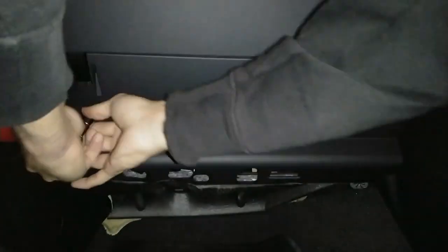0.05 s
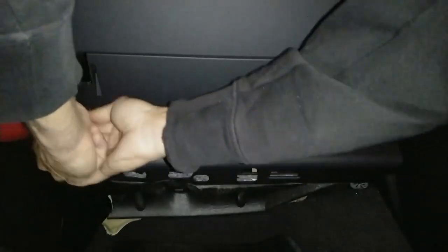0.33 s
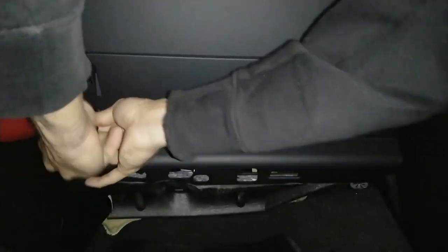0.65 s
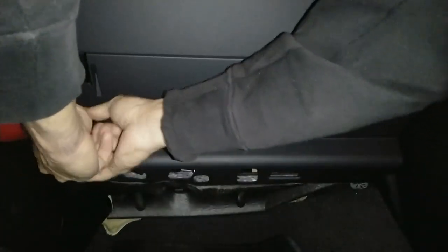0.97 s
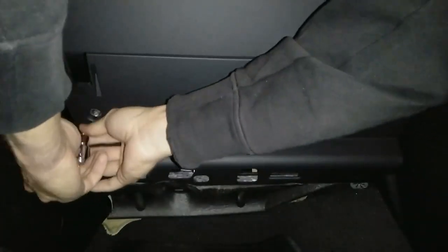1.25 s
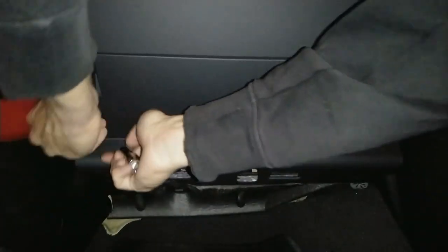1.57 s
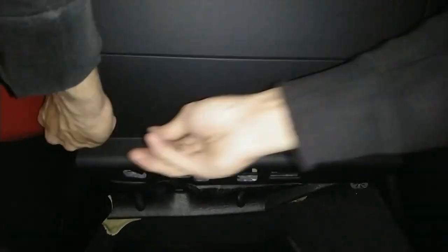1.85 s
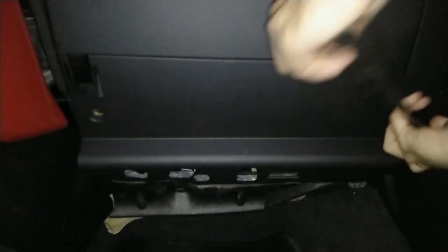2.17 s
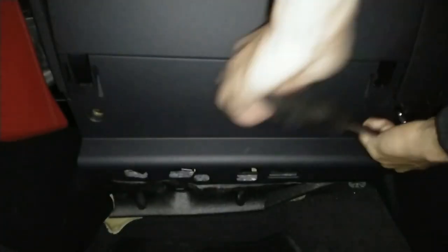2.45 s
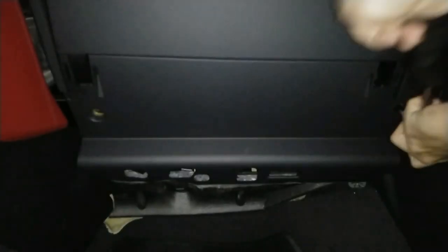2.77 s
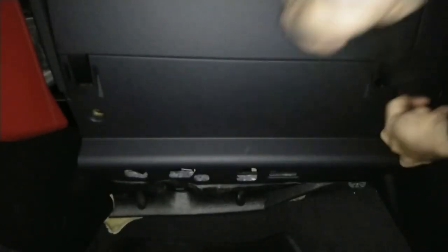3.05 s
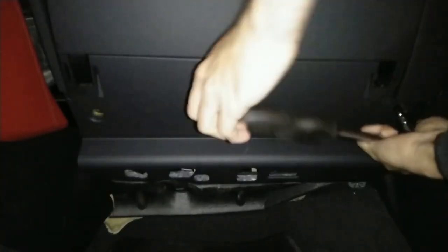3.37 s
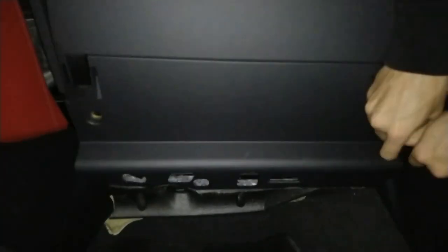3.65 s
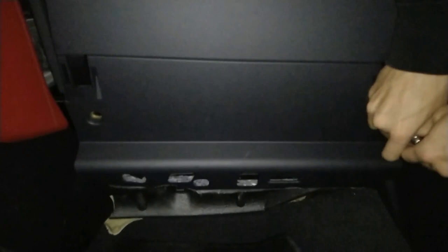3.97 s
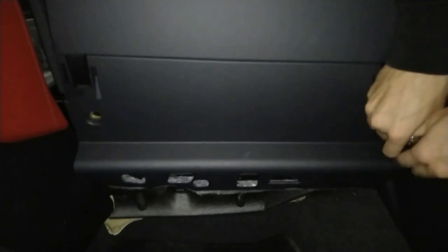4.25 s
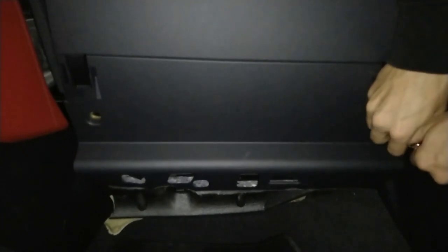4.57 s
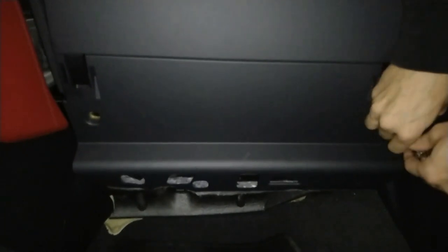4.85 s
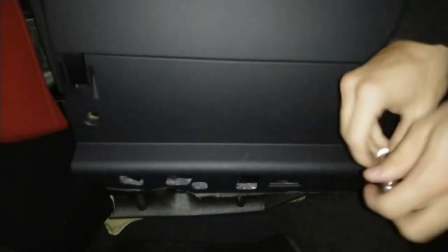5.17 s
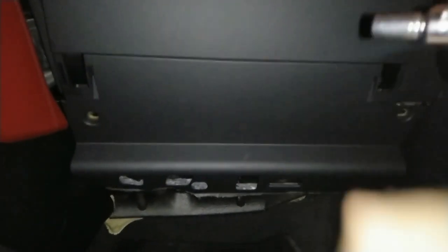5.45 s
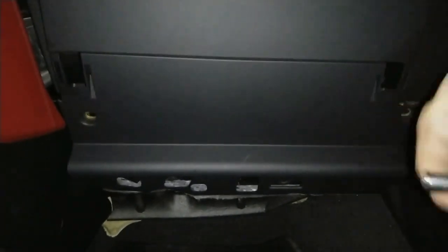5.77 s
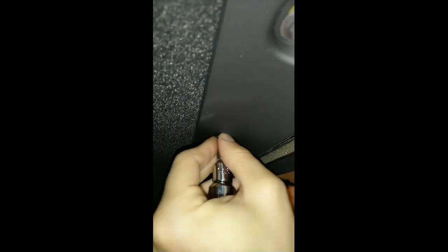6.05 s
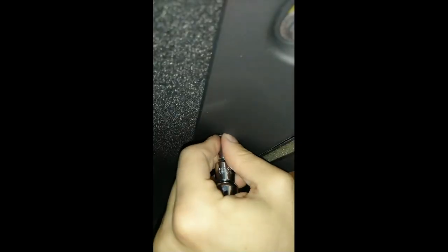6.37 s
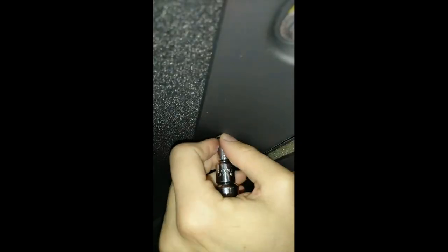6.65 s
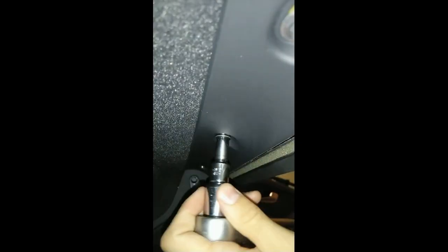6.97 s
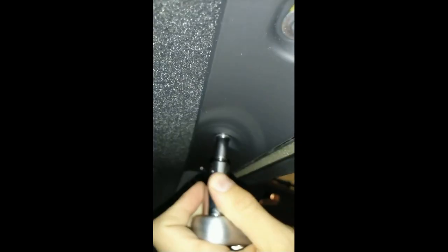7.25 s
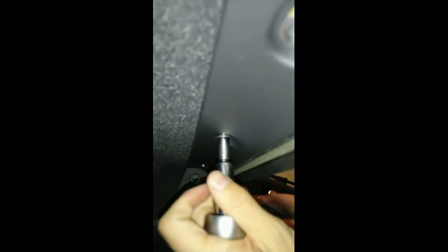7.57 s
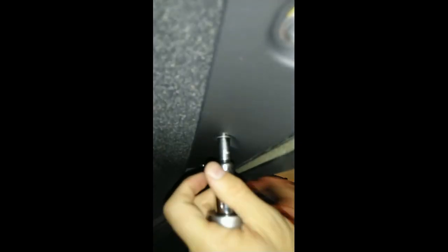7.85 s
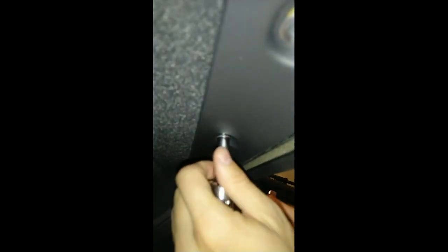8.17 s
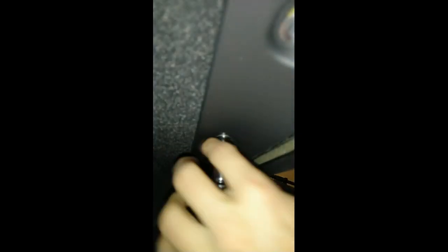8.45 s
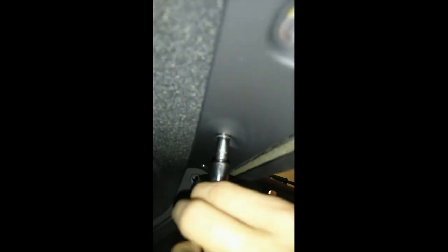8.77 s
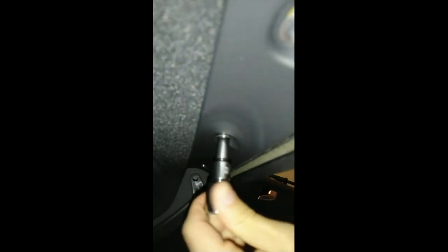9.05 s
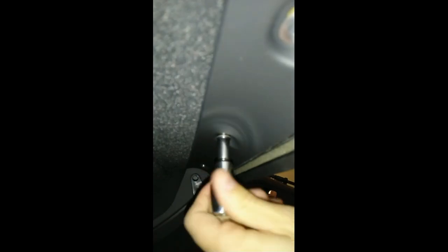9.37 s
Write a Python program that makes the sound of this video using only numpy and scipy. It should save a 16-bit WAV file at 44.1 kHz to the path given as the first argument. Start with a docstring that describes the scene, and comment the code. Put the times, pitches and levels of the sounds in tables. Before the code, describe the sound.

A nut driver clinks lightly as it is handled and fitted, among dull bumps on a plastic panel and faint swishes of cloth. A short steel squeak follows, then a near pause. The second part is louder and closer: a socket and its extensions, turned by hand, give sharp bursts of metallic rattling while the panel knocks and rumbles. The stereo microphone sits close by in a hushed car cabin.

```python
"""A socket on stacked steel extensions, twirled by hand close to a stereo microphone in a parked car:
its loose joints clash in quick bursts. Before that, a nut driver is handled, fitted and put aside with
light clinks, and the socket squeaks as it is worked loose. Throughout, tools and hands knock and rub on
the hollow plastic trim, and fingers and sleeves slide with a soft hiss over the hush of the cabin."""
import sys
import numpy as np
from scipy import signal
from scipy.fft import rfft, irfft
from scipy.io import wavfile

SR = 44100
rng = np.random.default_rng(int(sys.argv[2]) if len(sys.argv) > 2 else 0)


def persist_wave(psi):
    """Save psi, clipped to +-1, as 16-bit WAV."""
    counts = np.round(np.clip(psi, -1, 1) * 32767).astype(np.int16)
    wavfile.write(sys.argv[1], SR, np.atleast_2d(counts).T)


N = 415422
HIT_SIZE = 8192   # samples in one knock or clink
AGE = np.arange(HIT_SIZE) / SR
RIGHT_FROM_S, STACK_FROM_S = 2.1, 5.8   # the hands move to the panel's right end, then to the side cover

# Resonances of the hollow trim at the panel's left end, at its right end and at the side cover.
# Each row: frequency in Hz, level in dB, t60 in seconds.
LEFT_MODES = [(80, -1, .11), (112, 0, .1), (150, -3, .08), (182, 2, .11), (228, 0, .08), (275, 0, .08),
              (335, -1, .06), (405, 0, .07), (490, -4, .05), (590, 0, .03), (760, -2, .03), (1050, -3, .04),
              (1290, -3, .04), (1500, 0, .04), (1900, -1, .03), (2350, 0, .03)]
RIGHT_MODES = [(88, -4, .1), (104, 0, .11), (120, 0, .12), (156, -5, .11), (178, -1, .11), (210, 1, .12),
               (255, -5, .1), (350, -1, .07), (390, -1, .07), (480, -3, .06), (570, 3, .07), (690, -1, .06),
               (770, -5, .06), (1140, -3, .05), (1300, -3, .04), (1480, 0, .04), (1830, -1, .04),
               (2230, -1, .03)]
SIDE_MODES = [(80, -2, 0.1), (98, -2, 0.09), (126, -2, 0.1), (172, -6, 0.09), (218, -2, 0.11),
              (238, 2, 0.13), (275, -3, 0.08), (314, 0, 0.11), (347, -1, .11), (382, 0, 0.09),
              (490, -10, 0.04), (549.6, 1.5, .05), (611, 8.5, 0.07), (692.6, 3, .05), (793.5, -8.5, 0.13),
              (958, 5.5, 0.05), (1080, -4, 0.074), (1250, 3, 0.042), (1490, 1.5, 0.04), (1618, 3, 0.04),
              (1820, -6, 0.062), (2125, 2.5, 0.026), (2379, 2.5, 0.049), (2530, -7, 0.019),
              (2980, -1.5, 0.022)]
SITES = [LEFT_MODES, RIGHT_MODES, SIDE_MODES]
# Where the hands sit in the stereo picture. Each row: time in seconds, left over right in dB.
HAND_PAN = [(0, -2.5), (1.3, -2), (2.3, -1), (4.799, 1), (5.8, 2), (6.3, -3.5), (7.801, -4.5), (8.5, -1.5),
            (9.4, -2.6)]
# Strokes of the hands as they turn or shift a tool.
# Each row: start and length in seconds, then pressure, depth, hollowness and slide in dB.
STROKES = [(0, 0.18, -44.5, -1.5, -2.0, -63), (0.2, 0.08, -58, 2.5, -8.5, -85),
           (0.32, 0.12, -44, -1.5, -3.5, -58), (0.49, 0.13, -42, -3.0, -4.5, -57),
           (0.655, 0.1, -47, -3.0, -8.0, -90), (0.749, 0.18, -43, -2.0, -2.5, -62),
           (0.963, 0.12, -43, -2.5, -3.0, -63), (1.123, 0.052, -49.5, 2.5, -3.5, -90),
           (1.497, 0.1, -47.5, 0.5, -7.5, -61), (1.63, 0.08, -58, 0.0, -8.5, -72),
           (1.73, 0.07, -43, -4.0, -2.5, -65), (1.876, 0.17, -53.5, -3.0, -5.0, -73.5),
           (2.13, 0.03, -50, 0.0, -5.0, -59), (2.165, 0.11, -41, -3.0, -10.0, -52),
           (2.3, 0.12, -46, 0.0, -10.0, -59), (2.454, 0.24, -42, 0.0, -11.0, -52),
           (2.703, 0.16, -44, 3.0, -8.5, -63), (3.022, 0.083, -38, 0.0, -12.0, -50.5),
           (3.126, 0.1, -43, 5.0, -10.0, -61), (3.25, 0.05, -49, 5.0, -16.0, -85),
           (3.34, 0.07, -45, 0.5, -9.5, -53.5), (3.43, 0.07, -54, 0.0, -14.0, -65),
           (3.52, 0.13, -43.5, 5.0, -9.0, -62), (3.675, 0.052, -49, 3.0, -5.0, -69),
           (3.779, 0.15, -46.5, 0.5, -7.5, -67), (3.96, 0.06, -47, 1.5, -4.5, -55),
           (4.03, 0.11, -45, -2.5, -12.0, -61), (4.16, 0.14, -45, 5.0, -10.0, -62),
           (4.336, 0.048, -46, -1.5, -6.5, -62.5), (4.42, 0.23, -47, 0.0, -7.0, -63),
           (4.705, 0.05, -52, -8.0, -10.0, -54), (4.913, 0.05, -63, -6.0, -10.5, -73),
           (5.054, 0.1, -70, -7.5, -5.0, -77), (5.225, 0.11, -65, 4.0, -5.0, -69),
           (5.47, 0.05, -63, 12.0, -11.5, -62), (5.812, 0.08, -54, -5.0, -1.5, -62),
           (5.93, 0.08, -44, -5.0, -3.0, -53), (6.025, 0.075, -30, -3.0, -4.0, -50),
           (6.11, 0.067, -42, 2.5, -2.0, -54.5), (6.2, 0.29, -36.5, -4.0, -1.5, -52),
           (6.539, 0.16, -29.5, -7.0, -1.0, -46), (6.702, 0.066, -38.5, -1.0, -2.5, -49.5),
           (6.811, 0.087, -39, -2.5, -1.0, -54), (6.962, 0.085, -29, -5.0, -1.5, -42),
           (7.073, 0.1, -30, -12.0, 0.0, -49), (7.19, 0.04, -42, -0.5, -3.5, -57),
           (7.275, 0.2, -28, -6.0, 0.0, -45), (7.5, 0.12, -31, -9.0, -0.5, -56),
           (7.639, 0.11, -33, -7.5, -1.5, -52), (7.792, 0.11, -26, -7.0, -2.0, -46),
           (7.937, 0.11, -39, -2.5, -4.0, -46), (8.06, 0.19, -33, -2.5, -3.5, -45),
           (8.24, 0.09, -50, -2.5, -4.5, -56), (8.42, 0.15, -52, 3.0, -3.5, -66),
           (8.6, 0.06, -58, -1.0, -7.0, -72), (8.71, 0.13, -38, -5.5, 0.5, -56),
           (8.87, 0.11, -44, -5.0, 1.5, -60), (9.015, 0.22, -35, -4.0, 0.0, -52),
           (9.25, 0.17, -39, -7.5, -2.5, -54)]


def from_db(db):
    """Decibels to gain."""
    return 10 ** (np.asarray(db) / 20)


def rms_one(x):
    """Scale to unit rms."""
    return x / np.sqrt(np.mean(x ** 2) + 1e-20)


def onset_one(x, span_s):
    """Scale a blow to unit rms over its first moments."""
    return x / np.sqrt(np.mean(x[:, :int(span_s * SR)] ** 2) + 1e-20)


def panned(left_db):
    """Gains of the two channels, power kept."""
    return rms_one(from_db([[left_db / 2], [-left_db / 2]]))


def add(track, s, sound):
    """Mix a short sound in at s seconds."""
    i = max(int(s * SR), 0)
    track[:, i:i + HIT_SIZE] += sound[:, :max(N - i, 0)]


def coloured(x, colour, tilt_db=0, patchy_db=0):
    """Minimum-phase filter from rows of Hz and dB, with a treble tilt per octave and chance humps."""
    hz = np.maximum(np.arange(HIT_SIZE // 2 + 1) * SR / HIT_SIZE, 10)
    colour_hz, colour_db = np.transpose(colour)
    db = np.interp(np.log(hz), np.log(colour_hz), colour_db)
    db += tilt_db * np.log2(np.clip(hz, 2000, 12000))
    humps_hz = np.arange(0, SR / 2, 230)   # each point of contact has broad resonances of its own
    db += patchy_db * np.interp(hz, humps_hz, np.tanh(rng.standard_normal(len(humps_hz))))
    cepstrum = irfft(np.log(from_db(db)))
    cepstrum[1:HIT_SIZE // 2] *= 2
    cepstrum[HIT_SIZE // 2 + 1:] = 0
    response = np.exp(rfft(cepstrum))
    if x.shape[-1] == HIT_SIZE:
        return irfft(rfft(x) * response)
    return signal.oaconvolve(x, irfft(response)[None, :HIT_SIZE // 2], axes=-1)[:, :N]


def drift(hz):
    """Random wander of unit rms, mostly slower than hz."""
    step = 40
    pole = np.exp(-2 * np.pi * hz * step / SR)
    noise = rng.standard_normal(N // step + 2002)
    slow = signal.lfilter([1], [1, -2 * pole, pole * pole], noise)[2000:]
    return np.interp(np.arange(N) / step, np.arange(len(slow)), rms_one(slow))


def dying(t60):
    """Decay by 60 dB in t60 seconds."""
    return np.exp(-np.log(1000) * AGE / np.maximum(t60, 1e-3))


def scatter(t60, rise_s, tail_db, tail_t60, hold_s=0):
    """A dense burst of noise that swells and dies away into a faint cabin tail."""
    burst = np.minimum(dying(t60) * from_db(60 * min(hold_s / max(t60, 1e-3), 1)), 1)
    tail = from_db(tail_db) * dying(tail_t60)
    attack = 1 - np.exp(-AGE / rise_s)
    return rng.standard_normal((2, HIT_SIZE)) * attack * np.hypot(burst, tail)


def mode_bank(modes):
    """One decaying complex sine for each mode."""
    hz, db, t60 = np.array(modes, float).T[:, :, None]
    return from_db(db) * dying(t60) * np.exp(2j * np.pi * hz * AGE)


def registers(modes):
    """Sort modes by frequency into deep, low body, hollow upper body, clack and crisp."""
    return np.digitize(np.array(modes)[:, 0], [165, 290, 500, 1400])


def site_at(s):
    """Which part of the trim the hands are on."""
    return np.digitize(s, [RIGHT_FROM_S, STACK_FROM_S])


def gestures(rows, attack_s=.016, release_s=.022):
    """Gain over time for rows of start, length and dB: each takes hold, stays and lets go."""
    power, age = np.zeros(N), np.arange(SR) / SR
    for s, length, db in rows:
        i = max(int(s * SR), 0)
        shape = np.minimum(age / attack_s, 1) * np.exp(-np.maximum(age - length, 0) / release_s)
        power[i:i + SR] += (from_db(db) * shape[:N - i]) ** 2
    return np.sqrt(power)


def small_contacts(strokes, level_db, count, spread_db=2.5):
    """Chance touches in each stroke, stronger as the hand presses: rows of seconds and dB."""
    rows = []
    for s, length, pressure_db, *_ in strokes:
        starts = s + length * rng.random(count)
        rows += zip(starts, pressure_db + level_db + spread_db * rng.standard_normal(count))
    return rows


def friction(colour, slips_per_s, slip_db, smooth_db, uneven_db, uneven_hz, alike):
    """Stick and slip: tiny random catches over a smooth slide, under an uneven grip."""
    slips = (rng.random(N) < slips_per_s / SR) * from_db(slip_db * np.minimum(rng.exponential(1, N), 4))
    catches = signal.lfilter([1], [1, -np.exp(-1 / (0.0014 * SR))], slips ** 2 + 1e-18)
    grip = np.sqrt(catches / catches.mean() + from_db(smooth_db) ** 2)
    grip *= from_db(uneven_db * drift(uneven_hz))
    mid, side = rng.standard_normal((2, N))
    noise = np.sqrt(1 + alike) * mid + np.sqrt(1 - alike) * side * [[1], [-1]]
    return rms_one(coloured(grip * noise, colour))


def cabin_hush():
    """Room tone of the parked car: faint, steady noise, mostly bass."""
    # Spectrum of the hush. Each row: frequency in Hz, level in dB.
    colour = [(25, -14.5), (60, -5), (110, -7.5), (186, -1), (240, -12), (400, -33), (1000, -28),
              (4000, -54), (9000, -38.5), (11500, -52), (15000, -64)]
    return from_db(-64.5) * rms_one(coloured(rng.standard_normal((2, N)), colour))


def sleeves():
    """Cloth sweeps past the microphone with a high hiss, its threads catching finely."""
    # Passes of a sleeve. Each row: start and length in seconds, level in dB.
    swishes = [(1.47, .06, -60), (1.67, .04, -62), (2.41, 0.1, -49), (2.87, 0.048, -57), (3.29, .06, -58),
               (5.01, 0.032, -60.5), (5.34, .12, -67), (5.54, 0.062, -57), (6.73, 0.04, -37.5),
               (8.23, .06, -50), (8.33, .1, -59), (8.49, .12, -60)]
    # Spectrum of the cloth. Each row: frequency in Hz, level in dB.
    colour = [(2000, -32.5), (5000, -12), (7500, -4.5), (9000, 2), (11000, -8), (14000, -15), (15500, -13)]
    return gestures(swishes) * friction(colour, slips_per_s=600, slip_db=3, smooth_db=-2,
                                        uneven_db=1.3, uneven_hz=25, alike=.02)


def socket_bore():
    """Fingers slide over the open socket, and the air in its bore answers like a stopped pipe."""
    # Rubs across the mouth. Each row: start and length in seconds, level in dB.
    rubs = [(5.05, 0.11, -60.5), (5.245, 0.09, -64), (5.73, 0.08, -71)]
    # Spectrum of the bore. Each row: frequency in Hz, level in dB.
    colour = [(400, -22), (600, -9), (700, -18), (807, -8), (950, -15), (1090, -11), (1190, 1), (1330, -16),
              (1600, -24), (2800, -32), (3200, -25), (3450, -17), (3750, -27), (6000, -34)]
    return gestures(rubs) * friction(colour, slips_per_s=200, slip_db=2.5, smooth_db=2,
                                     uneven_db=1.5, uneven_hz=20, alike=.3)


def socket_squeaks():
    """Steel slips on steel as the socket is worked loose, sounding a cluster of mid resonances."""
    # Squeaks. Each row: start and length in seconds, level in dB.
    squeaks = [(4.712, 0.035, -38.5), (4.825, 0.01, -57), (4.915, 0.05, -67)]
    # Their spectrum. Each row: frequency in Hz, level in dB.
    colour = [(400, -30), (600, -3), (900, -12), (1200, 1), (1450, 0), (1650, -7), (1870, -6), (2400, -12),
              (5000, -24)]
    return gestures(squeaks) * friction(colour, slips_per_s=300, slip_db=2.5, smooth_db=0,
                                        uneven_db=1.2, uneven_hz=25, alike=.1)


def panel_rumble():
    """Stick and slip drive the trim's three lowest registers, in shares that change with each stroke."""
    # Spectrum of the driving friction. Each row: frequency in Hz, level in dB.
    colour = [(25, -20), (55, -6), (85, -1), (120, 0), (240, 0), (400, -1), (700, -10), (1500, -45)]
    drive = friction(colour, slips_per_s=110, slip_db=4, smooth_db=0,
                     uneven_db=2.5, uneven_hz=14, alike=.15)
    s, length, pressure_db, depth_db, hollow_db, _ = np.transpose(STROKES)
    shares_db = np.array([depth_db, np.zeros(len(s)), hollow_db])
    shares_db -= 10 * np.log10(np.sum(from_db(shares_db) ** 2, axis=0))
    out = np.zeros((2, N))
    for site, modes in enumerate(SITES):
        rings = mode_bank(modes).imag * (-1) ** np.arange(len(modes))[:, None]
        for k, share_db in enumerate(shares_db):
            response = rings[registers(modes) == k].sum(axis=0)
            body = signal.oaconvolve(drive, response[None], axes=-1)[:, :N]
            strokes_here = np.transpose([s, length, pressure_db + share_db])[site_at(s) == site]
            out += gestures(strokes_here) * rms_one(body)
    return out


def rubbing():
    """The turning tool scrapes and rumbles in the panel while sliding skin hisses."""
    # Scrape spectra at the left end, right end and side cover. Each row: frequency in Hz, level in dB.
    scrape_colours = [
        [(250, -25), (470, 3), (620, -2), (1000, -5), (1300, -6), (1800, -8), (2400, -6.5), (3000, -15),
         (8000, -42)],
        [(300, -30), (500, -2), (590, 5), (720, 1), (960, -10), (1150, -3), (1350, -5), (1600, -14), (2300, -9),
         (3000, -16), (8000, -42)],
        [(250, -34.5), (480, 0), (614, 5), (770, -3.5), (940, 0.5), (1080, -10.5), (1250, -2), (1420, -11.5),
         (1700, -9.5), (2450, -10.5), (4000, -22.5), (8000, -46)],
    ]
    # Scrape gain in dB at the same three places.
    scrape_db = [-10, -7.5, -8]
    # Spectrum of the hiss. Each row: frequency in Hz, level in dB.
    hiss_colour = [(1200, -20), (2800, -8), (4000, -8.5), (6000, -9), (7500, -4.5), (9000, 1.5),
                   (10200, -5), (11500, -14), (13500, -20), (15500, -27)]
    pressure = gestures([(s, length, db) for s, length, db, *_ in STROKES])
    slide = gestures([(s, length, db) for s, length, *_, db in STROKES])
    site, scrape = site_at(np.arange(N) / SR), np.zeros((2, N))
    for k, (db, colour) in enumerate(zip(scrape_db, scrape_colours)):
        scrape += (site == k) * from_db(db) * friction(colour, slips_per_s=120, slip_db=3, smooth_db=-1,
                                                       uneven_db=2, uneven_hz=22, alike=.03)
    hiss = friction(hiss_colour, slips_per_s=300, slip_db=3.2, smooth_db=-1,
                    uneven_db=2, uneven_hz=20, alike=.02)
    return from_db(-1.5) * panel_rumble() + pressure ** .9 * slide ** .1 * scrape + slide * hiss


def panel_knocks():
    """Soft blows move the panel's deep modes; hard ones also wake its upper modes, and clack and snap."""
    # Knocks on the trim, deep in the middle of the panel and shallow at its rim.
    # Each row: start in seconds, then relative level, depth, hollowness and hardness in dB.
    knocks = [(0.05, -34, -6, -3.0, -9.5), (0.099, -40, -10, 0.5, -2), (0.121, -34.5, -10, 1.5, -4.5),
              (0.3, -31, -5, -6.5, -18.5), (0.515, -32, -5, -5.5, -15), (0.545, -34, -8, -1.0, -18),
              (0.568, -33, -8, -5.5, -12), (0.72, -36, -8, -11.5, -17), (0.792, -30, -4, -3.0, -14),
              (0.845, -35, -3, -2.5, -14), (0.87, -30, -3, -1.0, -7.5), (0.973, -30, -7, -1.5, -5.5),
              (1.005, -33, -1, 3.5, -8), (1.072, -42, 4, -6.0, 2), (1.467, -40, 9, -8.5, -31),
              (1.545, -35, 4.5, -9.5, -8), (1.728, -33, -8.5, -1.5, -9.5), (1.799, -45, 7, -8.0, 5),
              (1.994, -30, -5, -3.0, -18.5), (2.224, -48, -6, -12.0, 5), (2.272, -49, 10, -5.5, 10),
              (2.37, -44, -3, -6.5, -6), (2.457, -25, -2, -15.0, -25), (2.495, -32, 10, -13.5, -6),
              (2.533, -43, -2, 0.0, 1), (2.625, -39.5, 7, -5.5, -2.5), (2.801, -49, 10, -3.5, 6),
              (2.893, -43, 7, -15.0, -30), (3.003, -26, -3, -11.0, -20), (3.025, -18, 2, -12.0, -6.5),
              (3.337, -34, 7.5, -10.5, -13), (3.366, -44, 7, -5.0, 4), (3.524, -24, 5.5, -10.0, -2),
              (3.576, -29, 6, 0.0, -8), (3.658, -50, -3, -9.0, 2), (3.689, -56.5, 10, -5.0, 10),
              (3.817, -38.5, -3, -6.0, 1.5), (3.903, -49, 1, -13.5, 3), (4.055, -41, 0, -16.0, -13),
              (4.1, -46, -4, -5.5, -3), (4.172, -39, 4, -11.0, -9), (4.19, -38, 3, -15.5, -11),
              (4.246, -52, 9, -3.5, 3), (4.339, -39, -3, -5.5, -8), (4.425, -54, -4, -3.0, 7),
              (4.52, -44, -3, -7.0, -7), (4.606, -45, -2, -9.5, -1), (5.47, -53, 31, -11.5, -15),
              (5.904, -15, -14, -1.5, -4.5), (5.922, -19, 0, -6.0, -22), (5.936, -25, -6, -1.0, -1),
              (6.028, -12.5, -4, -9.0, -10), (6.05, -21, 2, 0.0, -12), (6.075, -21, -6, 2.5, -14),
              (6.213, -31, -12, -3.5, -6), (6.227, -33, -12, -4.0, -8), (6.348, -37.5, -8, 1.5, 2),
              (6.405, -24, -10, -4.0, -14), (6.455, -29, -2, -2.5, -10), (6.486, -36, -10, 0.5, -1),
              (6.536, -28, -14, 1.0, -10), (6.626, -17, -12, 2.0, -7), (6.671, -17, -14, 2.5, -9),
              (6.802, -27, -8, 4.0, -9), (6.865, -21, -9, -1.5, -12), (6.885, -31, 2, -6.0, -10),
              (6.957, -24, 0, -1.0, -6), (6.976, -27, -8, -2.0, -5), (7.08, -25, -14, -2.5, -18),
              (7.133, -26, -15, 3.5, -7), (7.152, -21, -17, 3.5, -2.5), (7.233, -37, -5, 3.0, -1),
              (7.252, -22, -8, 2.5, -9), (7.331, -17.5, -14, 0.5, -13), (7.375, -22, -7, -0.5, -7),
              (7.397, -22, -12, 2.5, -12), (7.415, -19, -19, 1.5, -10.5), (7.437, -28, -6, -3.5, -1),
              (7.458, -20, -22, -8.0, -14), (7.529, -21, -25, -0.5, 0), (7.563, -26, -12, -2.5, 1),
              (7.649, -25, -10, -2.0, -10), (7.701, -25.5, -25, -1.5, -1), (7.74, -16.5, -29, 2.5, -14),
              (7.789, -25, -24, -2.5, -15), (7.81, -26, -15, -1.5, -7), (7.888, -18, -20, -6.5, -20),
              (7.965, -32, 1, -5.5, -7), (8.037, -25, -15, 0.0, -7), (8.049, -28, -22, 0.5, -8),
              (8.09, -13.5, 1, -9.0, -8), (8.181, -22, 2, 3.5, -5), (8.208, -27, -4, -7.0, -10),
              (8.457, -27, -10, 2.0, -11), (8.535, -42, -3, -6.5, -3), (8.759, -31, -12, 1.5, -16),
              (8.793, -20, -15, 1.5, -16), (8.812, -29, -10, -6.5, -6), (8.916, -30, -20, 3.0, -8),
              (8.977, -42, 1, -6.0, -2), (9.098, -26, -20, -1.0, -5), (9.128, -23, -12, 0.5, -8),
              (9.187, -27, -10, 0.0, -9), (9.21, -23.5, -3, -3.0, -16), (9.272, -20.5, -20, 0.0, -9.5),
              (9.301, -25, -20, 1.5, -8)]
    # Spectra of the plastic's clack and brighter snap. Each row: frequency in Hz, level in dB.
    clack_colour = [(200, -17), (600, 4.5), (1000, -5), (1400, -9), (2200, -26.5), (5000, -39),
                    (16000, -54.5)]
    snap_colour = [(700, -17.5), (1500, -0.5), (2500, -8), (4000, -11), (6500, -12.5), (9000, -8.5),
                   (12000, -25.5), (16000, -42.5)]
    # one light, shallow tap somewhere in each stroke
    taps = [(s, db, -10, 0, -6) for s, db in small_contacts(STROKES, level_db=-8, count=1)]
    reflections = dict(rise_s=.006, tail_db=-21.5, tail_t60=.13)   # off hands, near surfaces and cabin
    spread_db, mic_lag_s = 3.5, .000827
    out, banks = np.zeros((2, N)), [mode_bank(modes) for modes in SITES]
    for s, level_db, depth_db, hollow_db, hard_db in knocks + taps:
        site = site_at(s)
        bank, hz, register = banks[site], np.array(SITES[site])[:, 0], registers(SITES[site])
        clack = coloured(scatter(t60=.052, **reflections), clack_colour, patchy_db=4.2)
        snap = coloured(scatter(t60=.032, **reflections), snap_colour, patchy_db=4.2)
        blow = from_db(hard_db + 1.5) * onset_one(clack, .02)
        blow += from_db(hard_db - 4.5) * onset_one(snap, .02)
        contact_s = .0033 + .00008 * max(depth_db, 0)   # the yielding middle stays in contact longer
        attack = 1 - np.exp(-np.minimum(AGE / contact_s, 10) ** 2)
        # the modes start nearly together; short waves reach the two capsules by unlike paths
        cycles = .11 * rng.standard_normal(len(hz)) + hz * mic_lag_s * rng.standard_normal((2, len(hz)))
        strength = from_db(spread_db * rng.standard_normal(len(hz))) * np.exp(2j * np.pi * cycles)
        low_db = -20 * np.log10(np.hypot(1, from_db(hollow_db)))   # the two body registers share the level
        for k, db in enumerate([depth_db, low_db, low_db + hollow_db, hard_db - .5, hard_db - 11]):
            ring = (strength[:, register == k] @ bank[register == k]).imag
            blow += from_db(db) * onset_one(attack * ring, 1 / 35)
        add(out, s, from_db(level_db) * blow * panned(np.interp(s, *np.transpose(HAND_PAN))))
    return out


def clinks(rows, modes, colour, ring_db, left_db, hold_s, tail_db, tail_t60, tilt_share, shift_hz):
    """Steel meets steel: a hard crack and a ring that the fingers soon damp."""
    rise_s, onset_s, spread_db, pan_spread_db = .0012, .006, 4, 1.5
    lead_in_s, lead_in_db = .003, -19   # a faint, brief lead-in softens the start of each clink
    out, bank = np.zeros((2, N)), mode_bank(modes)
    for (s, db, bright_db, t60), free_db in zip(rows, ring_db + np.zeros(len(rows))):
        crack = scatter(t60, rise_s, tail_db, tail_t60, hold_s)
        lead_in = scatter(t60 / 2, lead_in_s, tail_db, tail_t60)
        crack, lead_in = coloured(np.array([crack, lead_in]), colour,
                                  tilt_db=tilt_share * bright_db, patchy_db=4.2)
        # every contact point favours other modes, and each reaches the two capsules in its own phase
        strength = from_db(spread_db * rng.standard_normal(len(modes)))
        phases = np.exp(2j * np.pi * rng.random((2, len(modes))))
        # the grip and the seating of the joints shift the ring a little from touch to touch
        shift = np.exp(2j * np.pi * shift_hz * rng.standard_normal() * AGE)
        envelope = (1 - np.exp(-AGE / rise_s)) * dying(4 * t60)
        ring = onset_one(((strength * phases) @ bank * shift).real * envelope, onset_s)
        gain = from_db(db) * panned(left_db + pan_spread_db * rng.standard_normal())
        add(out, s - lead_in_s, gain * from_db(lead_in_db) * onset_one(lead_in, onset_s))
        add(out, s, gain * (onset_one(crack, onset_s) + from_db(free_db) * ring))
    return out


def nut_driver():
    """Light clinks near the centre: a tight grip damps the shaft, loose fingers let it ring."""
    # Clinks. Each row: start in seconds, relative level and brightness in dB, crack's t60 in seconds.
    touches = [(0.1229, -36.5, -3.5, 0.039), (0.355, -48, -4, .04), (0.411, -45, 0, .035),
               (0.599, -45.5, -4, .035), (0.7553, -40.5, -12, 0.024), (0.841, -48, -7, .03),
               (0.8965, -45, 3, 0.03), (0.906, -44, 2, .03), (0.9593, -39.5, -7.5, 0.051),
               (1.0811, -25, 7, 0.02), (1.5667, -40.5, 4, 0.12), (1.6335, -37.5, 4, 0.059),
               (1.7955, -34, 6, 0.02), (1.9983, -38.5, -1.5, 0.08), (2.1585, -34.5, 1, 0.055),
               (2.1655, -30, -2.5, 0.012), (2.1969, -27.5, -0.5, 0.035), (2.2479, -43, 9, 0.015),
               (2.2739, -29.5, 1, 0.026), (2.533, -42, -6, .03), (2.5767, -26.5, 0.5, 0.025),
               (2.6145, -31.5, -2, 0.059), (2.6435, -30, -1.5, .04), (2.653, -31, 0, .04),
               (2.6705, -24, -2, 0.02), (3.0263, -22, -3, 0.03), (3.051, -35, 0, .02),
               (3.0783, -25.5, 0.5, .018), (3.1023, -28.5, 4, 0.019), (3.1953, -48, -12, 0.044),
               (3.512, -50, -4, .05), (3.5319, -31, -3.5, 0.038), (3.5929, -31, 2.5, 0.059),
               (3.704, -53, -5, .03), (3.8193, -32, 0, .025), (3.83, -33, -2, .02), (3.912, -46, -3, .02),
               (3.9799, -43, 2, .02), (4.018, -50, -5, .025), (4.1691, -43, -4, 0.035),
               (4.193, -45, 0, .025), (4.2509, -44, -2, 0.025), (4.431, -48, -4, .025),
               (4.624, -48, -2, .02), (4.7671, -35, 1, 0.022)]
    # Resonances of the shaft. Each row: frequency in Hz, level in dB, free t60 in seconds.
    modes = [(3350, -8, .04), (4030, -5, .04), (3700, -4, .05), (4230, 0, .07), (4450, 1, .075),
             (4680, 0.5, .08), (4930, -6, .05), (5900, -6, .05), (6500, -6.5, .04), (8600, -3, .04),
             (9150, 0, .04), (9500, -1, .04), (12000, -10, .04)]
    # Spectrum of the crack. Each row: frequency in Hz, level in dB.
    colour = [(400, -15), (1000, -3), (1600, -9), (2200, -7.5), (2700, -4), (3500, -4), (4350, -3.5),
              (5200, -6), (7700, -2), (9400, 5), (10500, -3), (12000, -8), (13700, -16.5), (15500, -24)]
    # Looseness of the grip. Each row: time in seconds, ring over crack in dB.
    looseness = [(0, -16), (2.05, -32), (2.151, -4), (2.7, -3.5), (3.12, -2.5), (3.3, -17.5), (4.799, -18)]
    ring_db = np.interp(np.array(touches)[:, 0], *np.transpose(looseness))
    return clinks(touches, modes, colour, ring_db, left_db=.5, hold_s=.003,
                  tail_db=-31, tail_t60=.12, tilt_share=.66, shift_hz=130)


def extension_stack():
    """Close up and a little to the right, the twirled stack's loose joints clash and rattle."""
    # Clashes. Each row: start in seconds, relative level and brightness in dB, crack's t60 in seconds.
    clashes = [(5.9115, -26, 0, 0.071), (5.939, -33, -2, .025), (6.0231, -36, -2, 0.027),
               (6.049, -35, -5, .03), (6.214, -41, -6, .025), (6.229, -42, -3, .025),
               (6.2591, -12, -1.5, 0.044), (6.293, -23, 0, .03), (6.2977, -10.5, 4.5, 0.029),
               (6.3495, -29.5, -5, 0.043), (6.366, -37, -6, .025), (6.38, -36, -2, .025),
               (6.3899, -28, 1.5, 0.05), (6.404, -31, -1, .04), (6.4573, -33.5, 1.5, 0.02),
               (6.555, -38, -4, .05), (6.571, -31, -1, .05), (6.5821, -13, 1, .04), (6.587, -15, 1, .035),
               (6.6045, -15, -3, .06), (6.612, -17, -1, .05), (6.6201, -17, 3, .05), (6.628, -17, 3, .04),
               (6.6589, -21.5, 0, 0.044), (6.9983, -14.5, 5, 0.052), (7.0313, -9, 7, .031),
               (7.0405, -12, 5, .03), (7.046, -14, 4, .025), (7.084, -35, -1, .025), (7.095, -35, 2, .02),
               (7.1523, -28, 6, 0.024), (7.162, -32, -3, .025), (7.252, -35, 0, .03), (7.27, -37, -2, .04),
               (7.2913, -19, -1, .063), (7.3079, -8.5, 3, .035), (7.3293, -8, 4, .036),
               (7.338, -17, 0, .05), (7.3555, -7.5, 4.5, 0.031), (7.404, -35, -6, .04),
               (7.44, -35, -6, .05), (7.5309, -20, -3, .035), (7.5385, -22, -3, .04),
               (7.5721, -8.5, 2, 0.03), (7.58, -16, 0, .03), (7.5903, -8, 4, 0.025), (7.596, -12, 3, .035),
               (7.604, -15, 1, 0.048), (7.6277, -21, 6.5, 0.0091), (7.6749, -34, -1.5, 0.05),
               (7.8379, -14, 2.5, 0.03), (7.844, -16, 2, .03), (7.8571, -11.5, -1.5, 0.035),
               (7.8747, -21.5, -6.5, 0.031), (7.9331, -29.5, -3, 0.05), (7.943, -33, -4, .04),
               (7.952, -33, -3, .04), (8.0987, -19.5, -1.5, 0.02), (8.1837, -29.5, -1, 0.041),
               (8.239, -42, -4, .04), (8.4593, -34.5, 8, 0.025), (8.5265, -35, 4, .06),
               (8.545, -39, 1, .04), (8.7969, -28, 13.5, 0.028), (8.888, -47, -6, .02),
               (9.182, -42, -1, .025), (9.2, -41, -1, .025)]
    # Resonances of the steel stack. Each row: frequency in Hz, level in dB, free t60 in seconds.
    modes = [(2385, -7.5, 0.088), (2480, 2, 0.059), (3110, -5, 0.06), (3350, -7, 0.06), (4330, 3, 0.05),
             (4500, -4, 0.05), (4960, 6, 0.036), (6370, 2, 0.07), (6520, 3, 0.07), (6800, 0, 0.06),
             (8333, 7, .06), (8490, 7, .05), (8792, 9, .06), (9300, 6, 0.036), (9858, 5, .07),
             (10012, 1.5, 0.054), (13400, -8, 0.028)]
    # Spectrum of the crack. Each row: frequency in Hz, level in dB.
    colour = [(400, -7.5), (1000, -8), (1800, -8), (2600, -1), (4300, 0.5), (5500, -3.5), (6550, 0),
              (7500, -3.5), (8700, 3.5), (10000, -4), (11000, -13.5), (12700, -21), (13300, -17),
              (14100, -27), (15500, -37)]
    twirls = [row for row in STROKES if row[0] > STACK_FROM_S]
    # two small, duller rattles in each twirl
    rattles = [(s, db, -6, .06) for s, db in small_contacts(twirls, level_db=-11, count=2)]
    return clinks(clashes + rattles, modes, colour, ring_db=-5, left_db=-3.5, hold_s=.0018,
                  tail_db=-31.5, tail_t60=.098, tilt_share=1, shift_hz=45)


def scene():
    """Hands, panel and tools over the hush of the cabin."""
    left_db = np.interp(np.arange(N) / SR, *np.transpose(HAND_PAN))
    pan = from_db(left_db / 2 * [[1], [-1]])
    hands = pan * (rubbing() + socket_squeaks() + socket_bore() + sleeves())
    return (cabin_hush() + hands + from_db(-5.5) * panel_knocks()
            + from_db(-.5) * nut_driver() + from_db(-2.4) * extension_stack())


def record(dry):
    """The recorder rolls off the deepest bass, rounds the hardest peaks and cuts the top."""
    low_cut = signal.butter(1, 55, "high", fs=SR, output="sos")
    high_cut = signal.ellip(10, .1, 70, 15900, fs=SR, output="sos")
    rounded = np.tanh(signal.sosfilt(low_cut, dry))
    return signal.sosfilt(high_cut, rounded)


dry = scene()
out = record(dry)
persist_wave(out)
```